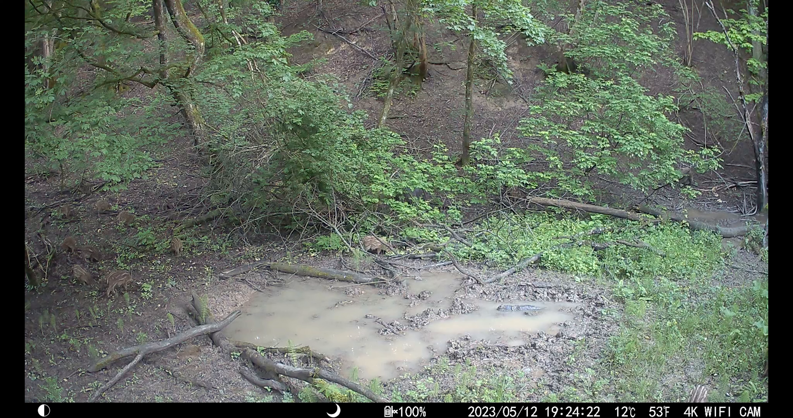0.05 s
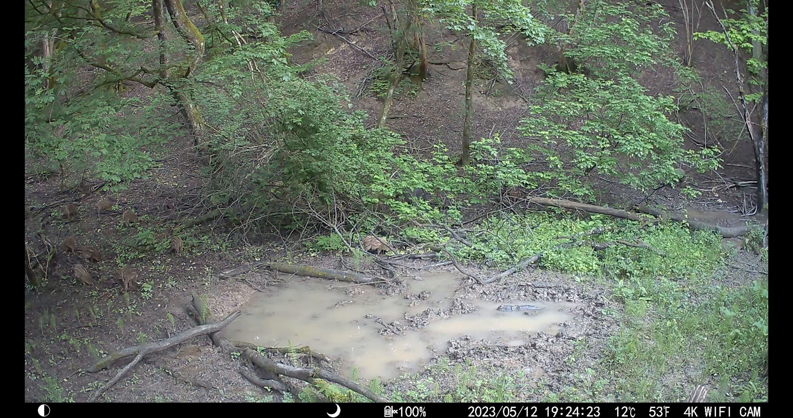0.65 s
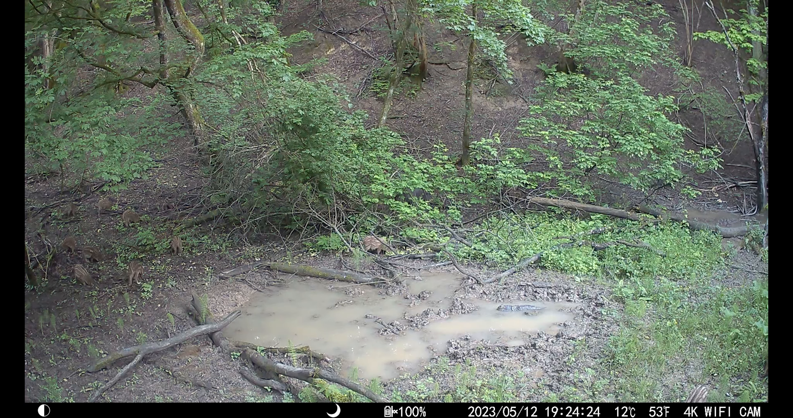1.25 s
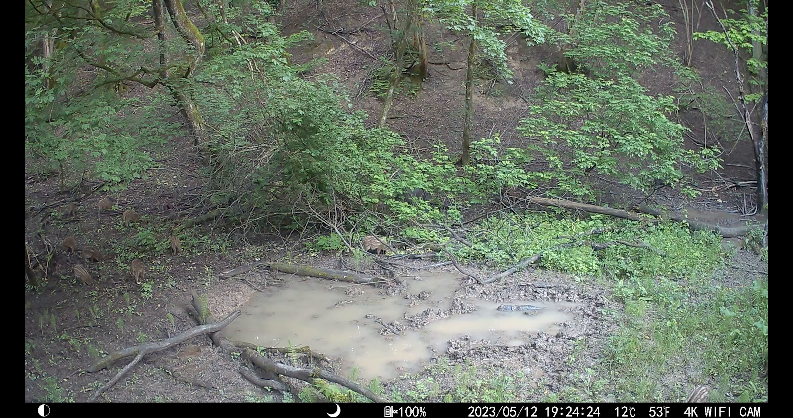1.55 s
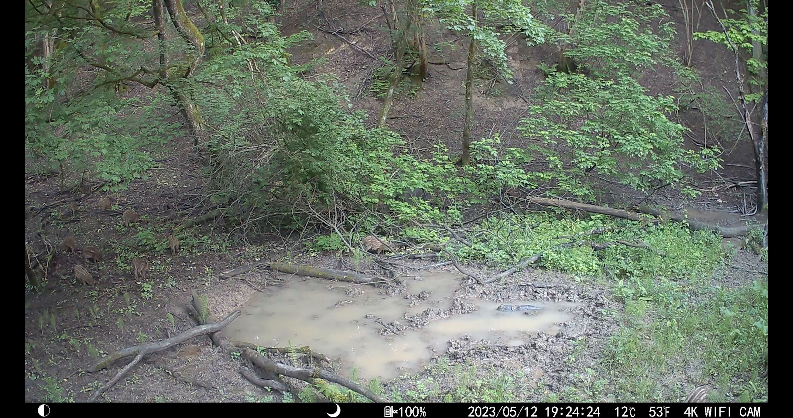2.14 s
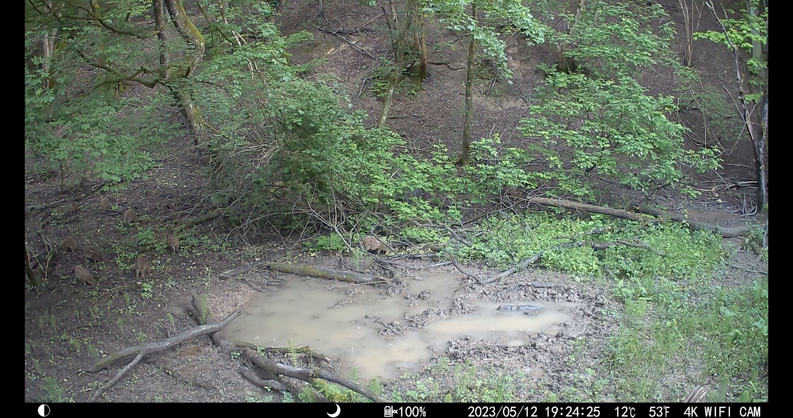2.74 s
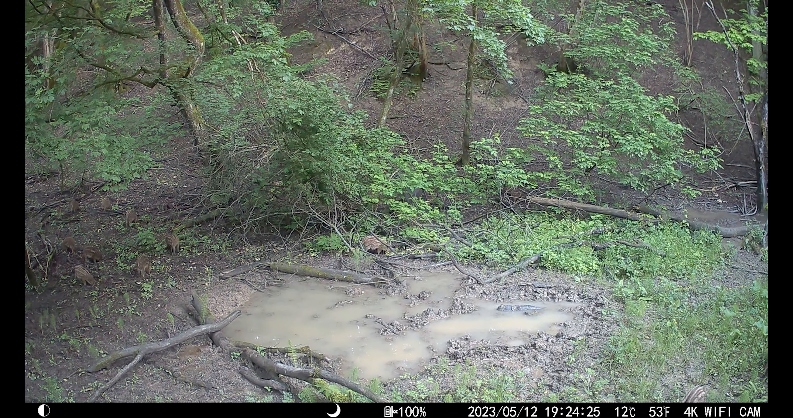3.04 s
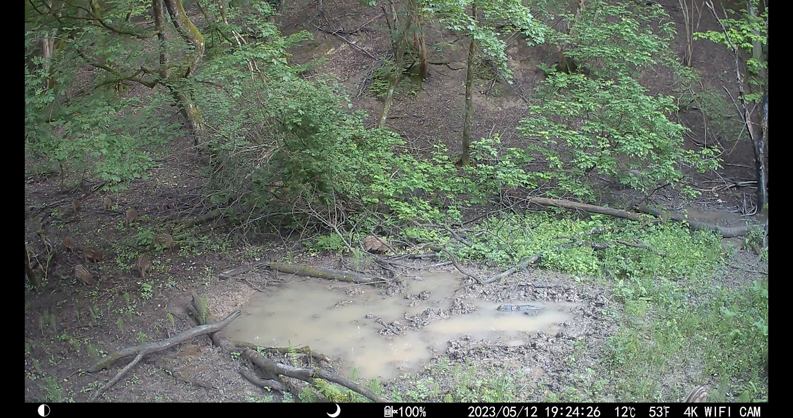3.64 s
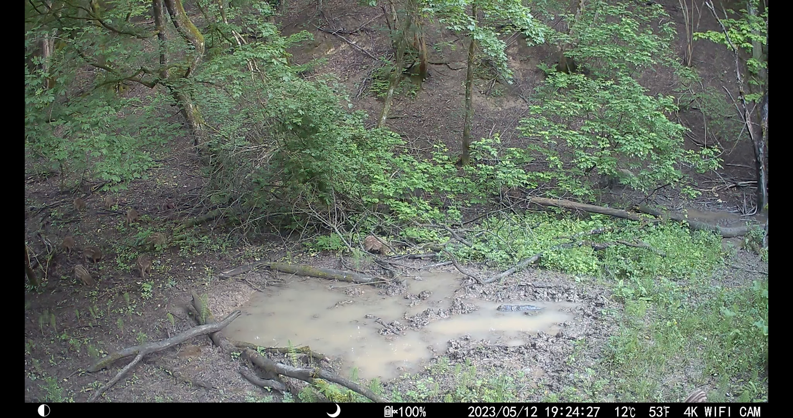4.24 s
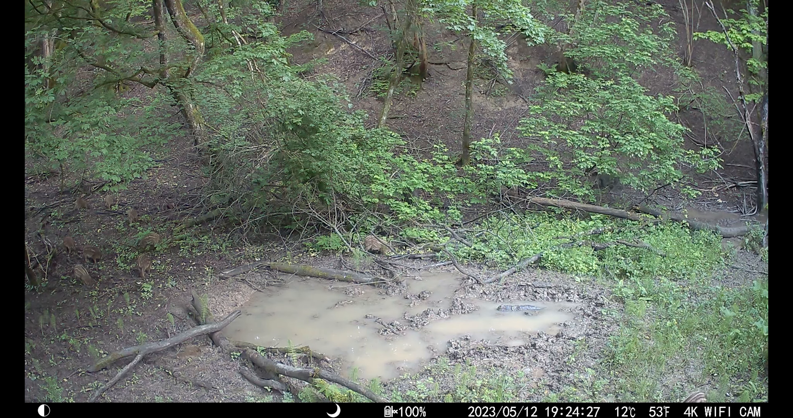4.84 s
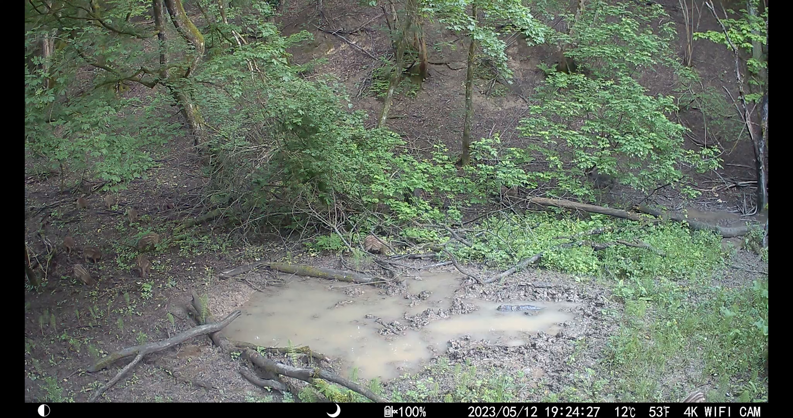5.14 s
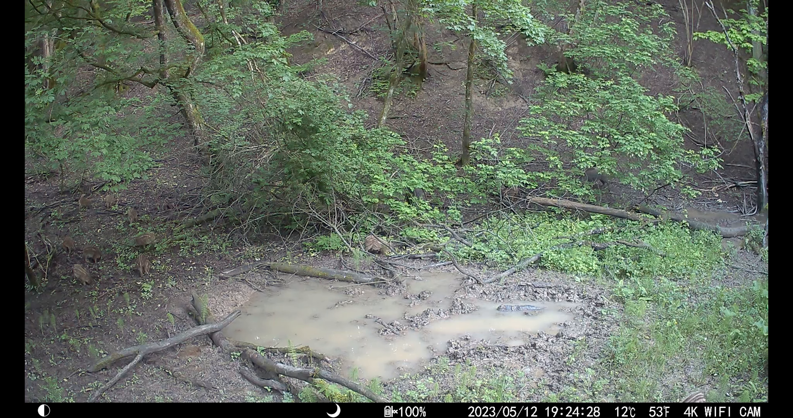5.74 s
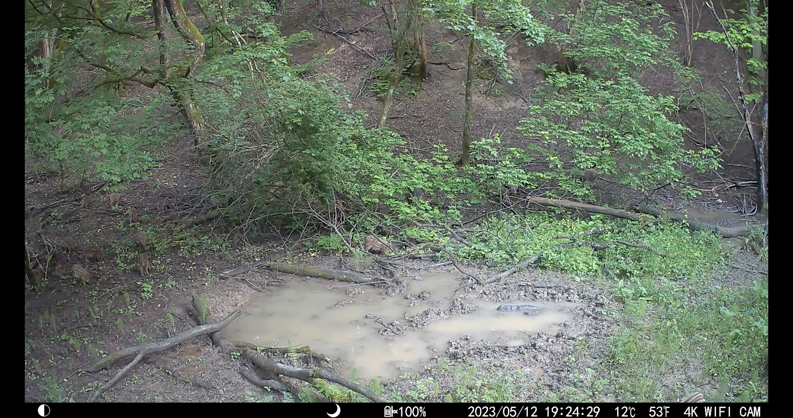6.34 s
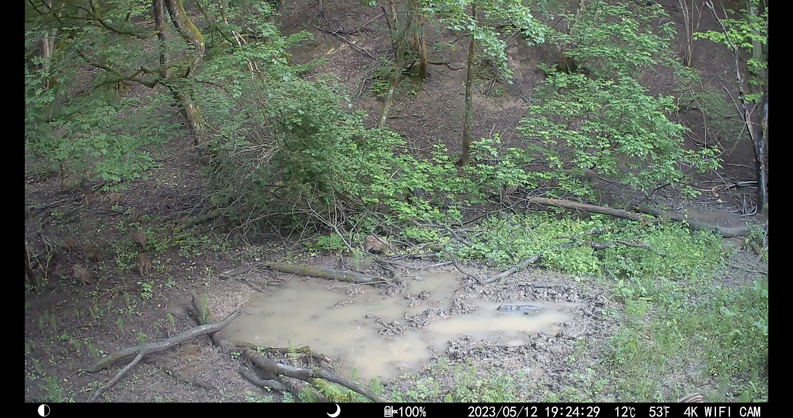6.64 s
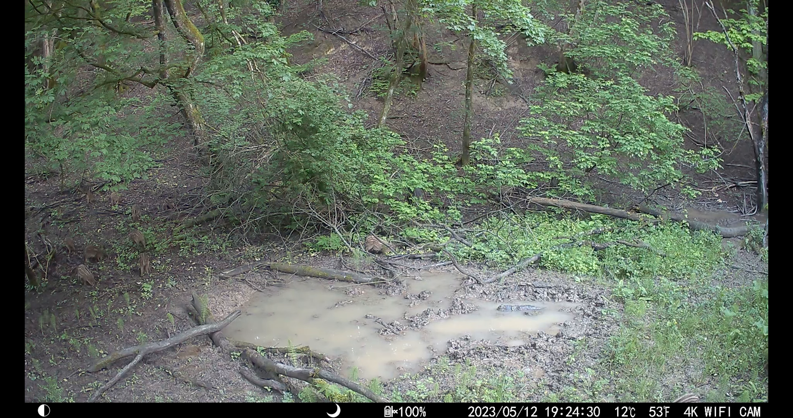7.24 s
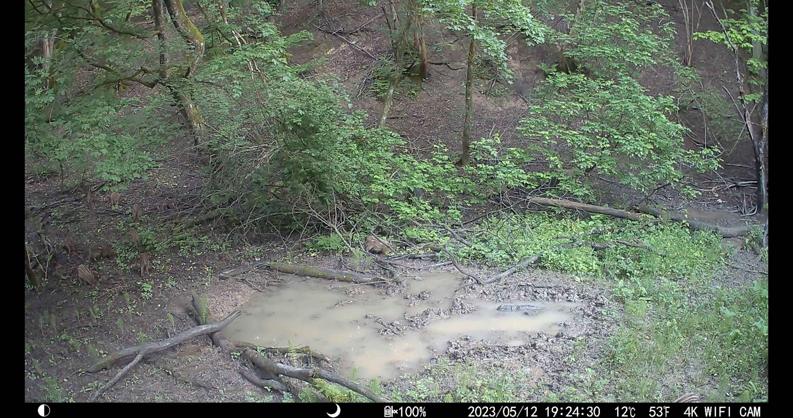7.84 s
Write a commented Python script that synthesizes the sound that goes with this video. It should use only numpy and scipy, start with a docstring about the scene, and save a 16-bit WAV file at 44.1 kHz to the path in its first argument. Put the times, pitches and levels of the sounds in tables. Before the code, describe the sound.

A quiet forest is heard through one microphone with a faint steady hiss and slight low rumble. Right at the start a finch sings a high, fast phrase: a buzzy downward slide, seven repeated notes, three quick hooked notes and a flourish, ending near 2 seconds with a soft echo from the trees. Throughout, a foraging boar makes faint leaf ticks, small twig snaps and occasional soft mud smacks. One sharp twig crack stands out at about 3 seconds. From 3.8 to 5 seconds a distant bird gives a sizzling trill of rapid falling notes. Thin whistles and chirps from other birds follow until about 6 seconds, with lighter snaps near 5.2 and 5.9. At 6.1 seconds the finch repeats its song, finishing just before 8 seconds, while a few very high, faint whistles sound behind it.

```python
"""In a quiet wood, a finch sings twice: a buzzy slide, repeated syllables, three hooks and a flourish.
Each bird's voice organ, the syrinx, makes an almost pure tone that sweeps in pitch. Farther birds
trill and whistle. Where a boar forages, leaves tick, twigs snap and mud smacks in short noise bursts.
Trunks and leaves echo it all back to a trail camera with one hissy microphone."""
import sys
import numpy as np
from scipy import signal
from scipy.fft import rfft, irfft, next_fast_len
from scipy.io import wavfile
from scipy.ndimage import uniform_filter1d

SR = 44100
rng = np.random.default_rng(int(sys.argv[2]) if len(sys.argv) > 2 else 0)


def generate_wav(signal):
    """Clip the signal to [-1, 1] and save it as 16-bit WAV at the path in sys.argv[1]."""
    frames = np.transpose(np.atleast_2d(signal))
    scaled = np.clip(frames, -1, 1) * 32767
    pcm = np.round(scaled).astype(np.int16)
    wavfile.write(sys.argv[1], SR, pcm)


N = 351913


def amp(db):
    """Turns decibels into a number to multiply a sound by."""
    return 10 ** (np.asarray(db) / 20)


def unit_level(sound):
    """Scales a sound to an average (rms) strength of 1."""
    return sound / np.sqrt(np.mean(sound ** 2) + 1e-20)


def at_pitch(table, hz):
    """Looks up a table of (pitch_hz, value), blending between rows along a scale of octaves."""
    pitches, values = np.transpose(table)
    return np.interp(np.log(hz + 1), np.log(pitches + 1), values)


def gain_curve(table):
    """Turns a table of (time_s, level_db) into a gain for every sample."""
    return amp(np.interp(np.arange(N) / SR, *np.transpose(table)))


def add(mix, start_s, sound):
    """Mixes a sound in at its start time."""
    part = mix[max(round(start_s * SR), 0):][:len(sound)]
    part += sound[:len(part)]


def colour(sound, tone):
    """Makes some pitches louder and others softer, by a table of (pitch_hz, gain_db)."""
    size = next_fast_len(len(sound), True)
    gains = amp(at_pitch(tone, np.fft.rfftfreq(size, 1 / SR)))
    return irfft(rfft(sound, size) * gains, size)[:len(sound)]


def wander(t, fastest_hz):
    """A smooth random wobble of size about 1, made of ten sine waves."""
    rates = fastest_hz * np.geomspace(1 / 10, 1, 10)[:, None]
    return np.sin(2 * np.pi * (rates * t + rng.random(rates.shape))).sum(0) / np.sqrt(10 / 2)


def background(hiss_db=-48, swell_db=1.5):
    """The microphone's hiss swells gently over a low rumble."""
    # tone of the hiss: pitch_hz, gain_db
    hiss_tone = [(290, -41), (500, -5.8), (750, -5.5), (1000, -7), (1400, -9.5), (2200, -8.5), (2800, -9.5),
                 (3300, -4), (4300, -3), (5000, .8), (6300, -7.3), (8200, -9), (9500, -15), (12000, -21),
                 (15500, -21.5)]
    # tone of the rumble: pitch_hz, gain_db
    rumble_tone = [(20, -5), (32, 1.5), (50, -2.5), (90, -3.5), (150, -8.5), (220, -15), (330, -16.5),
                   (480, -21.5), (650, -34.5)]
    # rise and fall of the rumble: time_s, relative_db
    rumble_levels = [(0, -57), (1, -54.5), (2, -53.5), (2.6, -56.5), (4.8, -58), (5.9, -55), (7.98, -57.5)]
    t = np.arange(0, N / SR, 1 / 100)
    swell = gain_curve(np.transpose([t, swell_db * wander(t, 4.2)]))
    hiss = unit_level(colour(rng.standard_normal(N), hiss_tone))
    rumble = unit_level(colour(rng.standard_normal(N), rumble_tone))
    return hiss * amp(hiss_db) * swell + rumble * gain_curve(rumble_levels) * amp(3.5)


def wood_echo(sound, ring_scale, build_s, turns_per_s=.9, paths=3):
    """Leaves and trunks scatter sound into a fading wash; its paths change as the source turns."""
    # time the wood takes to fade by 60 dB, before ring_scale: pitch_hz, ring_s
    ring_times = [(300, 2), (2000, 1.14), (4500, 1.18), (7000, 0.87), (12000, 1.28)]
    out = np.zeros(N)
    turn = 2 * np.pi * turns_per_s * np.arange(N) / SR
    for k in range(paths):
        echoes = rng.choice([-1., 1.], SR) * (rng.random(SR) < 5000 / SR)  # about 5000 in a second
        hz, t, bands = signal.stft(echoes, SR, nperseg=256)
        fade = amp(-60 * t / (ring_scale * at_pitch(ring_times, hz)[:, None]))
        build = 1 - np.exp(-t / build_s)
        tail = signal.istft(bands * fade * build, SR, nperseg=256)[1]
        share = np.sqrt(2 / paths) * np.cos(turn + np.pi * k / paths)
        out += signal.fftconvolve(sound * share, tail / np.linalg.norm(tail))[:N]
    return out


def trunk_echoes(sound):
    """Each near trunk sends back one late, softer copy."""
    # echoes from the trunks: delay_s, gain_db
    echoes = [(0.01, -3), (0.026, -11), (0.043, -8), (.076, -34)]
    out = np.zeros(N)
    for delay_s, db in echoes:
        add(out, delay_s, amp(db) * sound)
    return out


def dry_leaves(ticks_per_s=35, spread_db=3):
    """Dry leaves tick faintly under the boar, each tick a short puff of noise."""
    # rise and fall of the rustle: time_s, relative_db
    rustle_levels = [(0, -49), (.7, -49.5), (2.1, -51), (2.6, -67), (3.6, -52.5), (4.3, -49), (5.1, -55),
                     (6, -55), (7.98, -46.5)]
    starts = rng.random(N) < ticks_per_s / SR
    sizes = amp(spread_db * np.minimum(rng.exponential(1, N), 3))
    fade = np.exp(-np.arange(500) / 110)
    ticks = signal.oaconvolve(starts * sizes, fade)[:N] * rng.standard_normal(N)
    tone = [(300, .5), (1200, -1.5), (4000, 7.5), (7800, 4), (11000, -10.5), (15000, -14.5)]
    return unit_level(colour(ticks, tone)) * gain_curve(rustle_levels) * amp(-4)


def crack(start_s, db, pitch_hz, octaves, fade_s):
    """A click and brief splintering, pitched by the size of what gives way. Returns (start, sound)."""
    t = np.arange(4096) / SR
    hz = np.fft.rfftfreq(len(t), 1 / SR) + 1
    burst = 1.2 * rng.standard_normal(len(t)) * np.exp(-t / fade_s)
    burst[0] += 2  # the click
    band = (1 + (np.log2(hz / pitch_hz) / octaves) ** 2 / 2) ** -2
    lead = len(t) // 8  # room for the filter to ring ahead of the click
    sound = irfft(rfft(np.roll(burst, lead)) * band)
    return start_s - lead / SR, amp(db) * sound / abs(sound).max()


def mud(width_octaves=.48, fade_cycles=8.9):
    """Mud smacks are duller than snaps; the lower a smack, the longer it lasts."""
    # smacks and thuds: start_s, relative_db, pitch_hz
    smacks = [(1.387, -40.5, 2050), (2.579, -46, 636), (3.680, -37.5, 1900), (5.181, -42, 1280),
              (5.616, -41, 1930), (5.889, -46.5, 174), (6.955, -43, 2010)]
    out = np.zeros(N)
    for start_s, db, pitch_hz in smacks:
        add(out, *crack(start_s, db, pitch_hz, width_octaves, fade_cycles / pitch_hz))
    return out


def twigs():
    """Dry twigs break with short, bright cracks."""
    # breaking twigs: start_s, relative_db, pitch_hz, width_octaves, fade_s
    snaps = [(0.435, -34, 8150, 0.39, 0.0047), (0.645, -22.5, 4650, 1.7, 0.0033),
             (2.032, -33, 5200, 0.52, 0.0026), (2.068, -31.5, 6050, .8, 0.0014),
             (2.45, -30.5, 6400, 0.57, 0.0025), (2.9575, -18, 5800, 0.75, .0008),
             (2.9671, -10, 5600, 0.37, 0.00019), (2.9675, -13.5, 5300, 0.71, 0.0039),
             (2.9707, -8, 4600, 0.97, 0.00017), (2.971, -13, 5100, 0.32, 0.00039),
             (3.679, -31, 4700, 0.46, 0.0018), (5.122, -24, 4850, 0.78, 0.0033),
             (5.182, -27, 3000, 1.1, 0.0017), (5.225, -21.5, 4240, 0.45, 0.0017),
             (5.944, -13.5, 4580, 0.45, 0.00039), (6.106, -29, 3450, 1.74, 0.0042),
             (6.482, -24.5, 7900, 0.83, 0.0077), (6.975, -29.5, 7740, 0.6, .003),
             (7.253, -29, 7200, 0.93, 0.0045)]
    out = np.zeros(N)
    for snap in snaps:
        add(out, *crack(*snap))
    return colour(out, [(100, -3.5), (8000, 4), (11000, -14), (15000, -25)])


def syrinx(t, hz, db, buzz_depth_hz=0, waver=.0056, buzz_rate_hz=125, jitter=.249, flutter_db=3):
    """A bird's voice organ makes an almost pure tone; a buzz swings its pitch and strength."""
    buzz = np.sin(2 * np.pi * (buzz_rate_hz * t + jitter * wander(t, 59.896)))
    pitch_hz = hz * (1 + waver * wander(t, 253)) + buzz_depth_hz * buzz
    phase = 2 * np.pi * np.cumsum(pitch_hz) / SR
    tone = np.sin(phase) + amp(-36) * np.sin(2 * phase)  # with a faint octave above
    strength = amp(db + flutter_db * wander(t, 204.8))
    pulsing = 1 - .5 * np.tanh(buzz_depth_hz / 400) * np.roll(buzz, SR // 500)  # 2 ms behind the pitch
    return strength * pulsing * tone * signal.windows.tukey(len(t), .15)


def sweep(start_s, shape, pitch_scale, db, **voice):
    """The voice follows a shape, its pitches multiplied by pitch_scale. Returns (start, sound)."""
    times, pitches, levels = np.transpose(shape)
    t = np.arange(times[0], times[-1], 1 / SR)
    hz = uniform_filter1d(pitch_scale * np.interp(t, times, pitches), size=130)  # rounds the corners
    return start_s + times[0], syrinx(t, hz, db + np.interp(t, times, levels), **voice)


def far_whistles(ends_db=-6):
    """Other birds glide from one pitch to another, swelling and fading."""
    # whistles, chirps and a coo: start_s, length_s, first_hz, last_hz, relative_db, buzz_depth_hz
    calls = [(.18, 0.16, 2300, 2026, -50.5, 354), (.292, 0.027, 5130, 4700, -35, 30),
             (2.27, 0.033, 5180, 4930, -43.5, 402), (3.54, 0.13, 2230, 2156, -52, -11),
             (4.45, 0.52, 2543, 2620, -57.5, 92), (4.51, 0.092, 1377, 1437, -57, -4),
             (4.71, 0.074, 1742, 1995, -48, 30), (4.785, 0.092, 2044, 2144, -44, 70),
             (5.09, 0.083, 1800, 1690, -53, 25), (5.333, 0.025, 4120, 3430, -41.5, 36),
             (5.357, .026, 4140, 3270, -58, 120), (5.495, .06, 5300, 4930, -38, 141),
             (5.553, 0.028, 4500, 4150, -37.5, 148), (5.55, 0.14, 5080, 4950, -38.5, 140),
             (5.59, .022, 3990, 3510, -44, 60), (5.602, .012, 5230, 6200, -40, 150),
             (5.731, 0.014, 4500, 6350, -42, 150), (5.738, .038, 4136, 4075, -34.5, 35),
             (5.765, 0.015, 4900, 5620, -40, 0), (5.778, .012, 3970, 3520, -43, 0),
             (5.72, 0.26, 5040, 4960, -44, 130), (5.852, 0.014, 4850, 5860, -37, 2),
             (6.008, 0.034, 4810, 4800, -34.5, 60), (6.024, 0.014, 4884, 5600, -35, 100),
             (6.64, 0.057, 4140, 3820, -33, 18), (6.83, 0.064, 329, 320, -59, -11),
             (7.185, 0.1, 7870, 7660, -45, 40), (7.32, 0.15, 7870, 7800, -42.5, 25),
             (7.49, 0.12, 7740, 7700, -48, 85)]
    out = np.zeros(N)
    for start_s, length_s, first_hz, last_hz, db, buzz_depth_hz in calls:
        t = np.arange(0, length_s, 1 / SR)
        progress = t / length_s
        hz = first_hz + (last_hz - first_hz) * progress
        swell_db = ends_db * (2 * progress - 1) ** 2
        add(out, start_s, syrinx(t, hz, db + swell_db, buzz_depth_hz, waver=.001, jitter=.304))
    return out


def far_trill(rasp_hz=450, notes=13):
    """A far bird repeats a falling note ten times a second; a fast, uneven flutter makes it sizzle."""
    # loudness from first note to last: time_s, relative_db
    trill_levels = [(3.826, -34.5), (3.93, -34.5), (4.3, -35), (4.65, -38.5), (4.86, -36), (5.025, -41)]
    # one falling note: time_s, pitch_hz, relative_db
    note = [(0, 7600, -19), (.008, 6750, -3), (.018, 5900, -2), (.025, 5250, 2), (.042, 5050, 2.5),
            (.051, 4300, -5), (.061, 3400, -12)]
    out = np.zeros(N)
    times, levels = np.transpose(trill_levels)
    for start_s in np.linspace(times[0], times[-1], notes):
        add(out, *sweep(start_s, note, 1, np.interp(start_s, times, levels), waver=.016))
    flutter = signal.lfilter(*signal.butter(2, rasp_hz, fs=SR), rng.standard_normal(N))
    return out * unit_level(flutter)


def finch_syllables():
    """Each syllable is a quick flick, a clear held arch and a falling slur."""
    # syllables of both songs: start_s, arch_hz, arch_db, slur_db
    syllables = [(.236, 4320, -31, -32.5), (.396, 4344, -31, -37), (.559, 4273, -30, -34.5),
                 (0.719, 4270, -28, -32), (0.876, 4180, -28, -27), (1.043, 4090, -29, -27),
                 (1.205, 3790, -32.5, -27.5), (6.345, 4333, -28.5, -28.5), (6.508, 4245, -28.5, -28.5),
                 (6.667, 4216, -31.5, -29), (6.831, 4135, -29.5, -27.5), (6.998, 3950, -29, -27.5),
                 (7.168, 3836, -29.5, -27)]
    # the flick: time_s, base_pitch_hz, relative_db
    flick = [(-.006, 6400, -20), (0, 5450, -7), (.005, 4950, -4), (.011, 4600, -9), (.02, 4900, -8),
             (.028, 4500, -16)]
    # the arch: time_s, pitch_ratio, relative_db
    arch = [(.021, .84, -11), (.028, .94, -1), (.037, 1.005, 3), (.047, 1, 0), (.056, .975, -4),
            (.065, .92, -9)]
    # the slur: time_s, pitch_hz, relative_db
    slur = [(.060, 3850, -6), (.070, 3500, -3), (.078, 3300, -2), (.086, 2950, -5), (.096, 2500, -13),
            (.112, 1900, -23)]
    out = np.zeros(N)
    for start_s, arch_hz, arch_db, slur_db in syllables:
        flick_db = -29 + .33 * (slur_db + 29)  # swells a third as much as the slur
        add(out, *sweep(start_s, flick, .99, flick_db, waver=.021))
        add(out, *sweep(start_s, arch, arch_hz, arch_db, waver=.0071))
        add(out, *sweep(start_s, slur, 1, slur_db, buzz_depth_hz=197, waver=.031))
    return out


def finch_ending(start_s, db, hook_step_s=.078, step_db=1, flourish_delay_s=.131):
    """Three ever louder hooks whip up and buzz down, then both sides of the syrinx sing a flourish."""
    # rise and fall of a hook: time_s, base_pitch_hz, relative_db
    hook_up = [(.004, 3900, -32), (.010, 5230, -11), (.017, 6500, -12)]
    hook_down = [(.02, 5890, -1), (.036, 4925, 0.5), (.055, 4750, -1.5)]
    # the flourish's two voices: time_s, base_pitch_hz, relative_db
    high_side = [(0, 4200, -6), (.016, 4650, 1.5), (.05, 4550, 0), (.085, 4550, -2), (.115, 4450, -7),
                 (.16, 4400, -15)]
    low_side = [(0, 3770, -10), (0.052, 3850, -7), (.09, 3605, -5.5), (.125, 3348, -5.5),
                (.175, 2993, -12.5), (.21, 2500, -22), (.25, 2040, -30)]
    out = np.zeros(N)
    hook_times = start_s + hook_step_s * np.arange(3)
    for k, hook_s in enumerate(hook_times):
        hook_db = db + step_db * (k - 1)
        add(out, *sweep(hook_s, hook_up, 1, hook_db))
        add(out, *sweep(hook_s, hook_down, .98, hook_db, buzz_depth_hz=440, waver=.015))
    for side in high_side, low_side:
        add(out, *sweep(hook_times[-1] + flourish_delay_s, side, .97, db,
                        buzz_depth_hz=413, waver=.023, buzz_rate_hz=150, jitter=.45))
    return out


def finch():
    """Both songs go in the same order: a buzzy downward slide, the syllables, the ending."""
    # the songs: slide_s, slide_hz, slide_db, ending_s, ending_db
    songs = [(-.001, 5165, -28, 1.363, -31), (6.100, 4805, -27, 7.326, -32)]
    # the opening slide: time_s, pitch_ratio, relative_db
    slide = [(0, 1, -11.5), (0.068, 0.85, -7), (.13, .8, -6), (0.194, .75, -9.5)]
    out = finch_syllables()
    for slide_s, slide_hz, slide_db, ending_s, ending_db in songs:
        add(out, *sweep(slide_s, slide, slide_hz, slide_db, buzz_depth_hz=298, waver=.018))
        out += finch_ending(ending_s, ending_db)
    return out


def scene():
    """Mixes each source with its echoes from the wood; the far trill arrives mostly as echo."""
    # what the treetops scatter of the song: pitch_hz, gain_db
    treetop_tone = [(2500, 2.5), (3400, .5), (4200, -1.5), (5400, 3.5), (7000, 2)]
    # what the undergrowth scatters of a snap: pitch_hz, gain_db
    undergrowth_tone = [(1000, -3), (2200, -3), (3400, -4), (4800, -6), (6200, -5), (8000, -1), (11000, 4)]
    song, trill, whistles = finch(), far_trill(), far_whistles()
    snaps, smacks, leaves = twigs(), mud(), dry_leaves()
    scattered = colour(song, treetop_tone)
    near_leaves = wood_echo(scattered, ring_scale=.5, build_s=.012, turns_per_s=1.7)
    deep_wood = wood_echo(scattered, ring_scale=1.3, build_s=.04, turns_per_s=1.7)
    mono = amp(-2) * song + amp(-6.5) * trunk_echoes(song) + amp(-2) * near_leaves + amp(-5) * deep_wood
    mono += amp(-4) * trill + amp(1.5) * wood_echo(trill, ring_scale=.87, build_s=.016)
    mono += amp(.5) * whistles + amp(1) * wood_echo(whistles, ring_scale=.67, build_s=.0099)
    ground = colour(snaps, undergrowth_tone) + amp(-9) * smacks + amp(7) * leaves
    mono += snaps + amp(6) * smacks + leaves + wood_echo(ground, ring_scale=.51, build_s=.00079)
    return np.array([mono + background()] * 2)


def record(dry, notch_width_hz=24, top_hz=15600):
    """The camera cuts out the pitches of mains hum and its overtones, then the highest treble."""
    for hum_hz in 60 * np.arange(1, 9):
        dry = signal.lfilter(*signal.iirnotch(hum_hz, hum_hz / notch_width_hz, SR), dry)
    treble_cut = signal.firwin(511, top_hz, window=("kaiser", 9), fs=SR)
    return signal.oaconvolve(dry, treble_cut[None], "same")


dry = scene()
out = record(dry)
generate_wav(out)
```